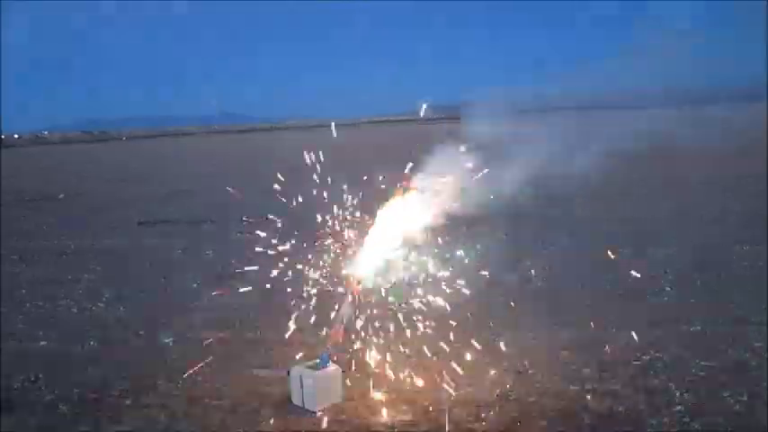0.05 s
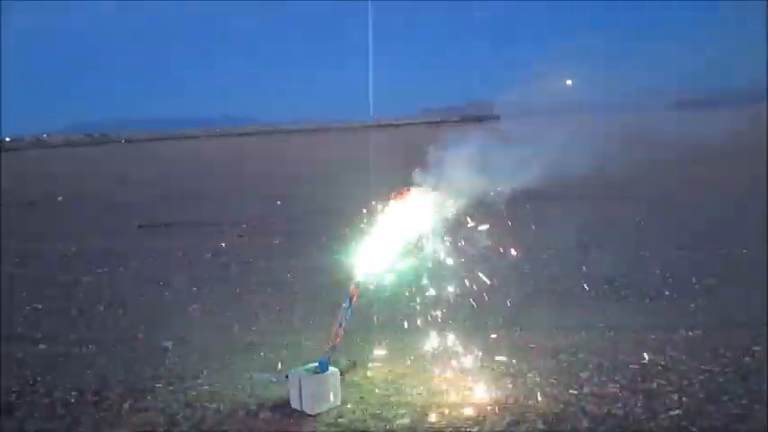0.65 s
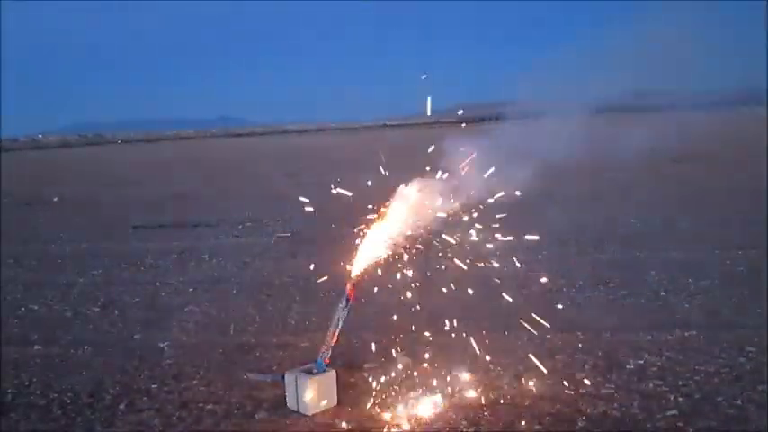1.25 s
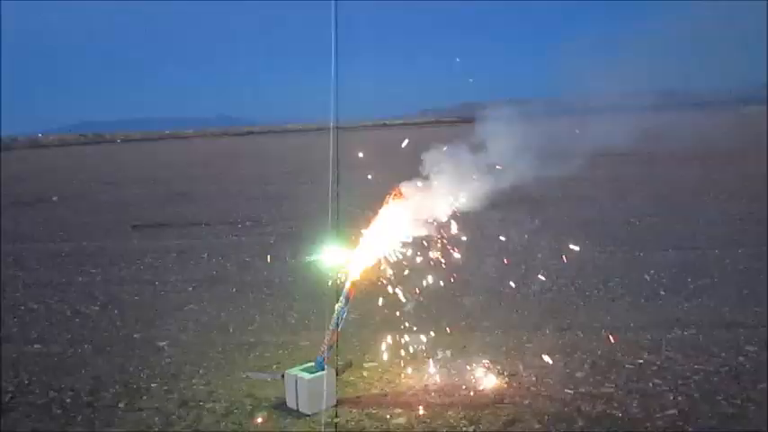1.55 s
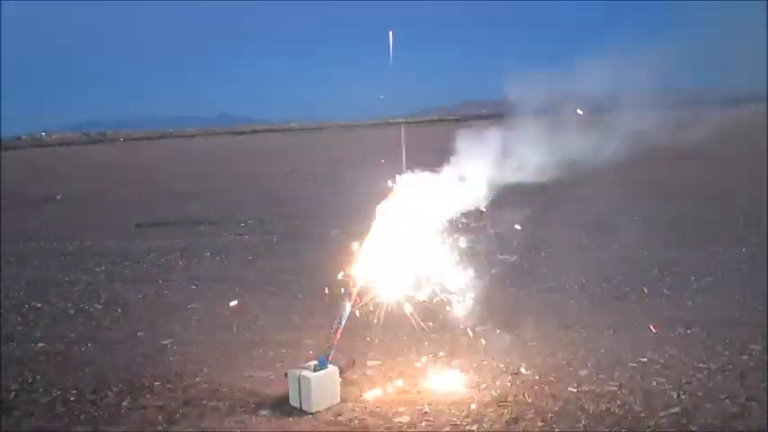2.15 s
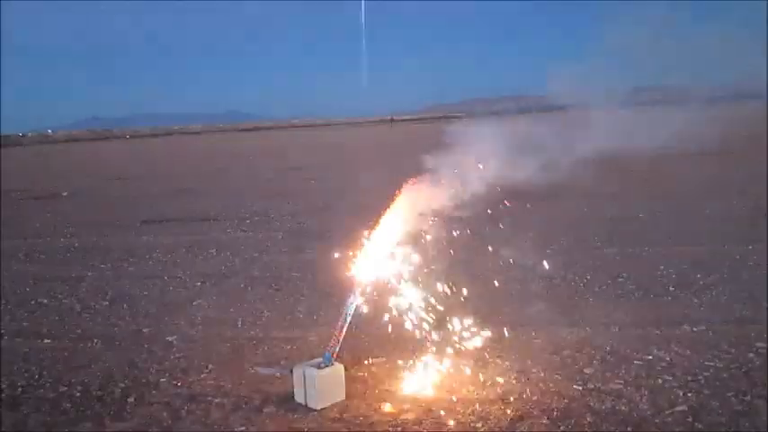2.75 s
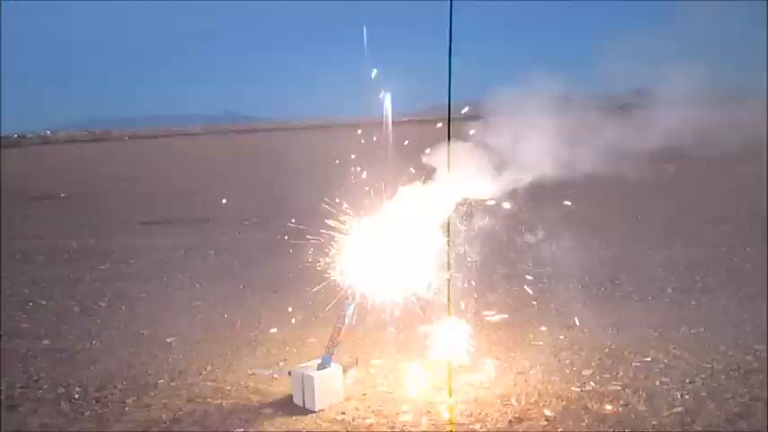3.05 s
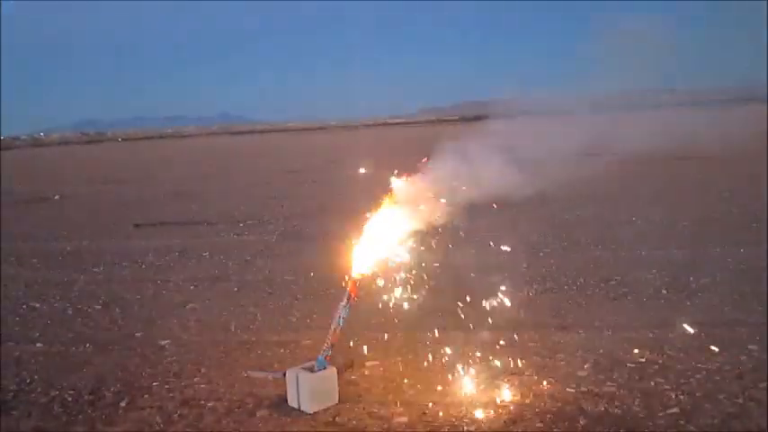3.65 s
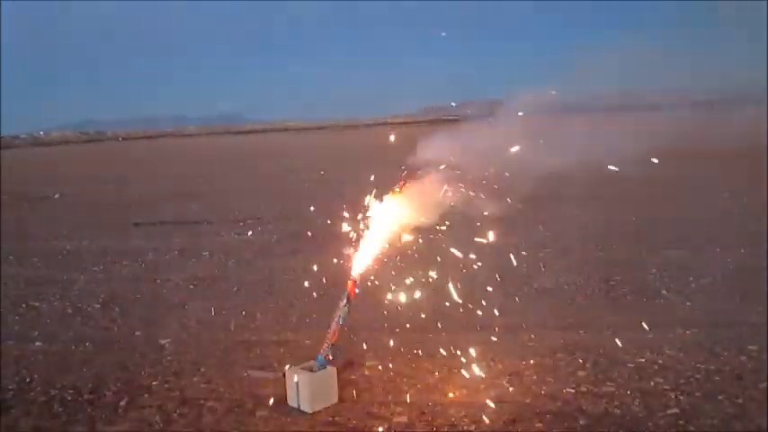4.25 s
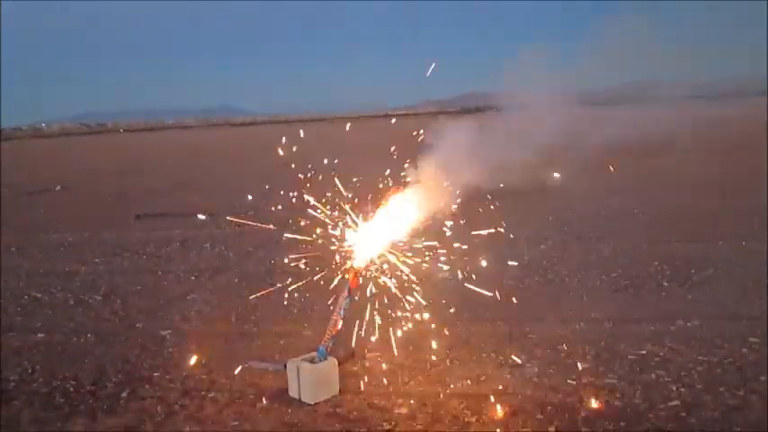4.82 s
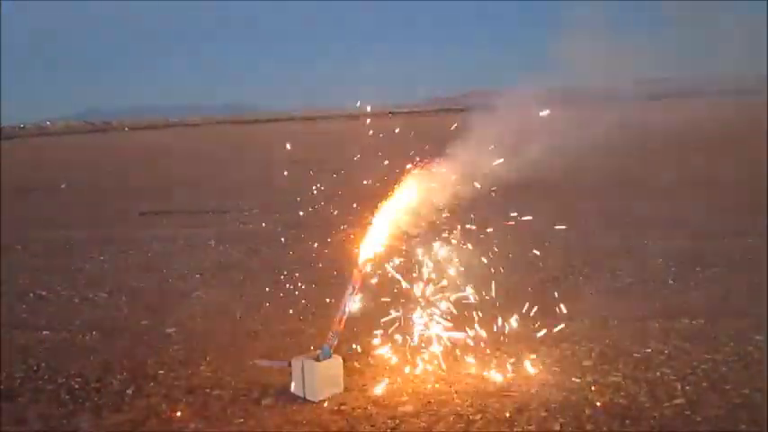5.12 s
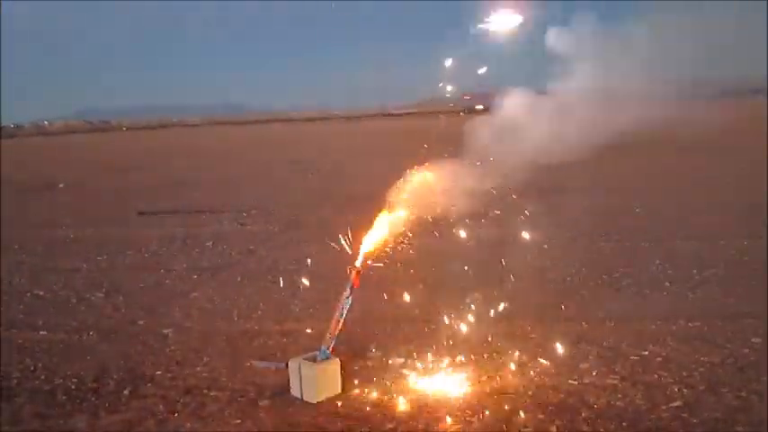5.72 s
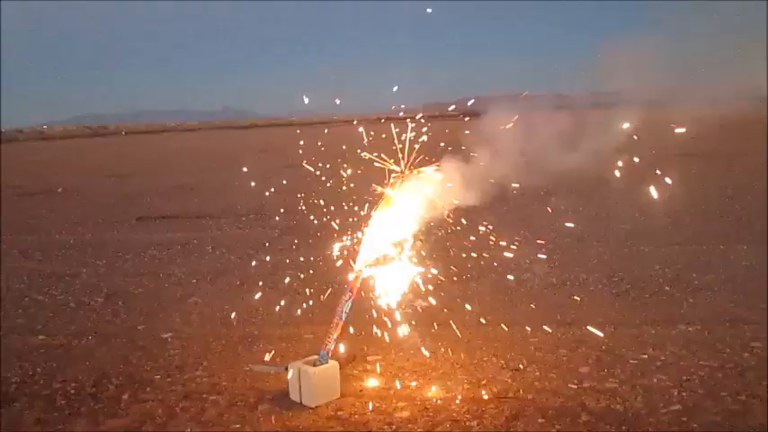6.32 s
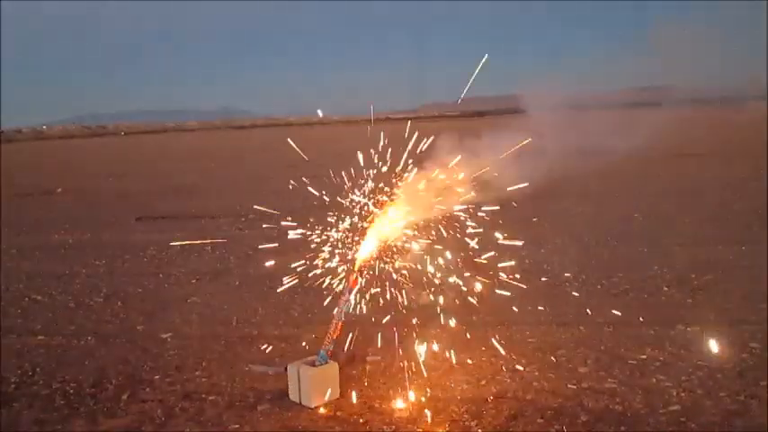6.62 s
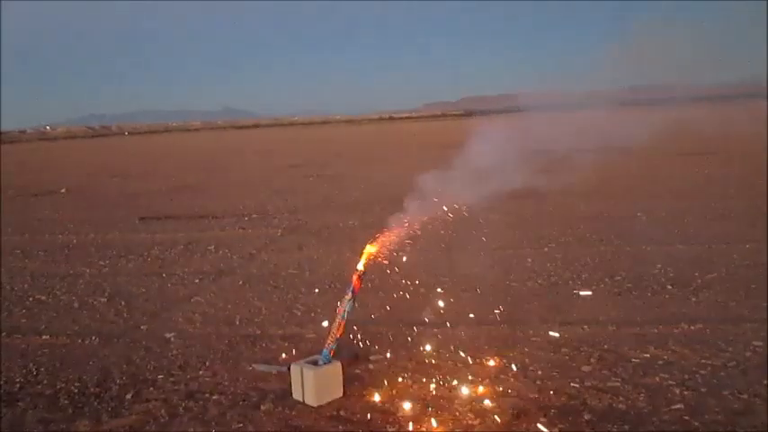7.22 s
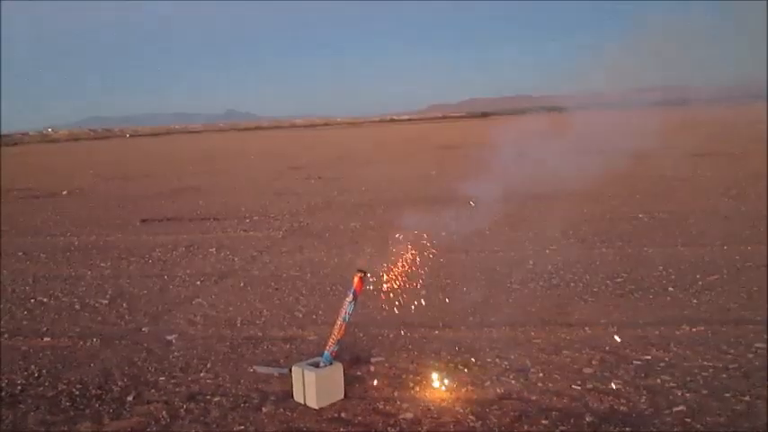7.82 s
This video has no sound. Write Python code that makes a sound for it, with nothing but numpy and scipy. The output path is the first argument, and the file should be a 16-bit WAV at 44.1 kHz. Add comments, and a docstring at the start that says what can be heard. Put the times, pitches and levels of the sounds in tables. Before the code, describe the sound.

A firework fountain burns on open gravel a few metres away. From the start there is a soft, fluttering rush of flame, a faint sizzle of tiny sparks and a low, wavering hum with rumble, like an engine idling far off. All three continue quietly throughout. Almost at once, much louder pops break in, short and sharp, in irregular clusters of several a second. Each scatters briefly off the stones; strong ones are followed by a tiny snap, and some ring hollow. Heavy pops stand out at about 1.6, 3.1 and 5.5 seconds, with a deeper one at 3.2. The popping pauses briefly around 4.5 seconds, and the sizzle swells in patches from 5 seconds. The pops are thickest between 6 and 7 seconds, peaking near 6.6. Hollow, biting bursts take over from about 7.2 seconds until the end, just before 8 seconds.

```python
"""A flame rushes, tiny sparks sizzle and a low hum drones; almost at once, loud pops break in.
A firework fountain burns on open gravel, a few metres from a hand-held camera.
Its pellets burst one by one: each pop is a short blast, mirrored by the ground and scattered by the
stones. Some pops ring hollow; strong open-air pellets shed a crumb that snaps a moment later."""
import sys
import numpy as np
from scipy import signal
from scipy.fft import rfft, irfft, next_fast_len
from scipy.io import wavfile
from scipy.ndimage import map_coordinates

SR = 44100
rng = np.random.default_rng(int(sys.argv[2]) if len(sys.argv) > 2 else 0)


def dump(signal):
    """Clip the signal to [-1, 1] and save it as 16-bit WAV at the path in sys.argv[1]."""
    limited = np.clip(np.atleast_2d(signal).T, -1, 1)
    pcm = np.round(limited * 32767).astype(np.int16)
    wavfile.write(sys.argv[1], SR, pcm)


N = 347062

# gas jet envelope: (time [s], relative level [dB])
FLAME_LEVEL = [(0, -57.5), (1.2, -57.5), (1.51, -55.5), (1.78, -57), (3.0, -58), (3.44, -64), (4.3, -59),
               (5.2, -56.5), (7.87, -60.5)]
# gas jet spectrum: (frequency [Hz], gain [dB])
FLAME_SPECTRUM = [(100, -20.5), (350, -2.5), (750, 2), (1200, -6), (1700, -9.5), (2500, -24), (5000, -28),
                  (9000, -37), (16000, -51)]
# fine spark envelope: (time [s], relative level [dB])
SIZZLE_LEVEL = [(0, -62), (0.3, -76.5), (0.7, -71), (1.3, -81), (1.42, -65), (2.05, -68.5), (2.3, -77),
                (2.9, -64), (3.5, -72), (3.75, -69), (4.4, -68), (4.64, -87), (4.97, -57), (5.4, -81.5),
                (5.6, -59.5), (6.05, -64), (6.6, -56.5), (7.25, -79)]
# fine spark spectrum: (frequency [Hz], gain [dB])
SIZZLE_SPECTRUM = [(800, -17), (2500, 3), (4500, 2.5), (7000, -6.5), (10000, -7.5), (13000, -16.5),
                   (15000, -30), (17000, -34.5)]
# lines of the hum: (frequency [Hz], level [dB])
HUM_LINES = [(74.3, -60), (148.6, -62), (198.5, -65.5), (209, -70.5), (219.5, -66), (222.8, -56.5)]
# rumble spectrum: (frequency [Hz], gain [dB])
RUMBLE_SPECTRUM = [(20, -9), (45, -0.5), (80, 4.5), (110, 0), (170, 0.5), (250, 0.5), (340, -2.5),
                   (700, -32.5), (3000, -73.5)]
# pellets bursting in open air: (time [s], energy [dB], centre [Hz], crack [dB])
OPEN_POPS = [(0.038, 3.5, 1110, 6), (0.0436, 11, 600, 3), (0.1813, -18.5, 700, 8), (0.206, -2.5, 980, -4),
             (0.2256, 3.5, 1060, -13), (0.3163, 5.5, 760, -0.5), (0.3479, -19, 1150, 4),
              (0.3865, -12.5, 740, -0.5), (0.493, 9.5, 735, 3), (0.5149, 10, 835, -1),
             (0.6153, -17.5, 800, 13), (0.6351, -17, 860, -2), (0.706, -16, 720, 10),
             (0.7125, -15.5, 1150, -4), (0.774, -28.5, 1000, -12), (0.8444, -14, 2050, -10.5),
             (0.9054, -33, 1100, 4), (0.9178, -20.5, 600, -3), (0.9765, 6, 910, -4.5), (0.995, 9, 717, 3.5),
             (1.0485, -14, 820, 6), (1.1468, -14, 1355, 1), (1.1806, -20, 2010, -16), (1.195, 2, 1000, -7),
             (1.234, -3, 850, 5), (1.2473, -18.5, 1500, -2), (1.3832, -20, 1340, -5), (1.6072, 14, 560, 9),
             (1.6455, 5, 810, -6), (1.9589, -18, 1100, 8), (1.9776, 6.5, 730, -0.5), (2.1608, 1, 740, 8),
             (2.2022, -14, 1980, -17), (2.2364, 9.5, 624, 4.5), (2.366, 8, 870, -26),
             (2.3942, 8.5, 580, 5.5), (2.5671, -20.5, 1050, 6), (2.695, -26, 507, 2),
             (2.8008, 5.5, 1150, -10), (2.834, -3.5, 900, 5), (2.8386, -4.5, 880, -10),
             (2.8904, -16, 900, 3), (2.902, -18, 1500, -3), (2.9944, -13.5, 1980, -13.5),
             (2.9993, 2.5, 626, 5.5), (3.081, -2, 695, 7), (3.0862, 15.5, 802, 0), (3.2302, 14.5, 265, 2),
             (3.3885, 5, 773, -9.5), (3.4083, -1.5, 670, 3), (3.4191, -20, 1380, 1),
             (3.4485, -21.5, 2600, -20), (3.524, -25, 1790, -18), (3.5507, -16, 920, 2),
             (3.5549, -15.5, 1220, -3.5), (3.8658, -1, 550, 2), (3.9197, 0, 700, 1),
             (4.0306, -20, 1600, -2), (4.0527, 9.5, 836, -6), (4.146, -12, 600, 14), (4.1654, 5.5, 730, 3),
             (4.2433, -19, 700, 10.5), (4.297, -2.5, 590, 8), (4.3162, -13, 1000, -14),
             (4.3307, 0.5, 910, -13), (4.3685, -1, 690, 5), (4.738, -25.5, 1900, -17), (4.7969, 7, 870, -8),
             (4.825, 4.5, 1180, -12), (4.838, -8.5, 910, -6), (4.8934, -25, 1300, 2),
             (4.9168, -2.5, 690, 0.5), (4.9427, -22, 730, 7), (5.0905, 6, 743, 2.5),
             (5.1229, -13.5, 900, -3), (5.145, -16, 1100, -1), (5.1493, -13.5, 800, 7.5),
             (5.2128, -11, 1400, -5), (5.216, 5.5, 694, 5), (5.2534, -12, 1400, 1), (5.308, -15, 900, 5),
             (5.3165, -16.5, 1120, -3), (5.3433, -16.5, 750, -9.5), (5.4477, -11, 1020, -3.5),
             (5.471, 12.5, 660, 5.5), (5.6294, -1.5, 770, 10.5), (5.6334, -11.5, 900, -17),
             (5.6532, -18.5, 756, 7), (5.7548, -20.5, 690, 3), (6.038, -13, 1240, -12.5),
             (6.1096, -21, 800, 6.5), (6.1397, -1.5, 1050, -12.5), (6.1583, 6.5, 990, 2.5),
             (6.182, 0, 1310, -2.5), (6.203, 3.5, 800, 4), (6.2343, 9, 708, 3), (6.2885, -4, 1250, -12),
             (6.313, 9, 864, -29), (6.3301, -4, 1900, -16), (6.3462, -15, 2280, -7.5),
             (6.3576, -10, 1420, -2), (6.37, -22, 900, 12), (6.3797, -18.5, 2600, -6),
             (6.4116, 5.5, 1042, -3), (6.423, -12, 1340, -6), (6.432, -6.5, 910, 4),
             (6.4824, -13.5, 700, 7), (6.512, -2, 756, 2), (6.5617, -7, 2690, -4.5),
             (6.5855, 16.5, 386, 6.5), (6.621, 9.5, 960, -3.5), (6.6741, 11.5, 780, -1),
             (6.7212, 6.5, 960, -19), (6.7275, -2.5, 1150, -12), (6.7602, -17.5, 1390, 10),
             (6.8367, -7.5, 1580, -11), (6.8861, -13.5, 1330, 3), (6.9174, -6, 1420, -2.5),
             (6.9677, -18, 770, 8), (6.9882, -0.5, 730, 6), (7.0167, -10.5, 1000, -3),
             (7.0263, -1.5, 1850, -3), (7.0434, -9, 670, 1), (7.061, -19, 960, 11), (7.082, -5.5, 2450, -8),
             (7.0983, -6.5, 720, 10), (7.1176, -13, 1220, 5), (7.367, -4.5, 1880, -7),
             (7.5513, -15, 1350, -1), (7.5618, -7, 710, 10.5)]
# ringing pops, as of pellets bursting in the tube mouth:
# (time [s], energy [dB], ring [Hz], damping [width/centre], bite [dB])
TUBE_POPS = [(0.3578, -9, 1350, 0.94, 0), (1.093, -9.5, 1720, 0.38, -12), (1.5153, -2, 1630, 0.34, -8),
             (1.6932, -9.5, 1480, 0.85, 5), (2.09, -16, 1730, 0.12, -9), (3.366, -19, 1610, 0.25, 3),
             (3.6413, -1.5, 1670, 0.5, 2), (4.2837, -7, 1110, 0.98, 9), (4.9866, -3, 1480, 0.41, -5),
             (5.8623, 4, 660, 0.35, 13), (6.13, -7, 1390, 0.35, 5), (7.1668, -19, 907, 0.41, 19),
             (7.2868, 7, 1036, 0.53, 10), (7.3461, -19.5, 1200, 0.58, 10.5), (7.4526, -8, 757, 0.89, 7.5),
             (7.4697, 11, 1070, 0.86, 8.5), (7.5146, -5, 1264, 0.49, 5), (7.527, -8.5, 1210, 0.6, 4),
             (7.7375, -16.5, 1170, 0.53, 10), (7.7414, 5, 1050, 0.51, 9.5), (7.8473, -25.5, 990, 0.33, 0)]
# small, high blasts swing least: (centre [Hz], damping [width/centre])
BLAST_DAMPING = [(250, 1.54), (600, 1.33), (750, 1.5), (1100, 2.23), (2500, 4.8)]
# small pellets burst higher up: (centre [Hz], ground echo delay [ms])
GROUND_ECHO = [(300, 1.8), (700, 1.787), (900, 1.95), (1200, 1.997), (2000, 3.2)]
# only the heaviest open-air bursts bite hard: (energy [dB], bite [dB])
BLAST_BITE = [(-20, 1.5), (9, 1.5), (10.5, 6.5)]
# scatter off near stones: (frequency [Hz], gain [dB])
NEAR_SPECTRUM = [(100, -5.5), (400, 2), (1300, -1.5), (2500, 1.5), (6000, -3), (15000, -2.5)]
# scatter off far stones: (frequency [Hz], gain [dB])
FAR_SPECTRUM = [(100, -21), (600, -17.5), (1500, -3), (3500, -1.5), (7000, -0.5), (15000, -5)]
# blast colour at the microphone: (frequency [Hz], gain [dB])
MIC_SPECTRUM = [(100, 3.5), (250, 1.5), (400, -3.5), (700, 1.5), (1200, -1.5), (1650, 0), (2300, -6),
                (3200, -1.5), (4200, 0.5), (6000, 1), (9000, 1.5), (12000, -2.5), (15500, -8),
                (17000, -33.5)]
# narrow dips of the camera: (centre [Hz], width [Hz])
CAMERA_NOTCHES = [(3950, 190), (7900, 170)]


def amp(db):
    return 10 ** (np.asarray(db) / 20)


def unit_rms(x):
    return x / np.sqrt(np.mean(np.abs(x) ** 2) + 1e-20)


def lookup(rows, x):
    return np.interp(x, *np.transpose(rows))


def gain(points, hz):
    """Linear gain from (frequency [Hz], gain [dB]) points, log frequency axis."""
    points_hz, db = np.transpose(points)
    return amp(np.interp(np.log(hz + 1), np.log(points_hz + 1), db))


def wobble(rate_hz):
    """Smooth random curve through rate_hz knots a second."""
    knots = rng.standard_normal(int(N * rate_hz / SR) + 4)
    return map_coordinates(knots, [np.arange(N) * rate_hz / SR])


def filtered(x, response):
    """x through a complex response(hz)."""
    size = 2 * next_fast_len(N // 2 + SR // 4)
    return irfft(rfft(x, size) * response(np.fft.rfftfreq(size, 1 / SR)), size)[:N]


def coloured(x, spectrum):
    """x shaped by a spectrum table, rms 1."""
    return unit_rms(filtered(x, lambda hz: gain(spectrum, hz)))


def flame(gain_db=1, flutter_db=1.9):
    """The jet of burning gas rushes and flutters."""
    level_db = lookup(FLAME_LEVEL, np.arange(N) / SR) + flutter_db * wobble(rate_hz=9.1)
    return amp(level_db + gain_db) * coloured(rng.standard_normal(N), FLAME_SPECTRUM)


def grit(size, spread_db=4):
    """Noise with an uneven level from sample to sample."""
    return rng.standard_normal(size) * amp(spread_db * rng.standard_normal(size))


def sizzle(gain_db=2, rate_hz=34, spread_db=4, spurt_s=0.006, wash_s=0.019, rise_s=0.0007):
    """Tiny sparks flare at random: each a short gritty spurt and its wash over the gravel."""
    starts = rng.random(N) < rate_hz / SR
    strengths = amp(spread_db * np.clip(rng.standard_normal(N), -2, 2))
    t = np.arange(SR // 10) / SR
    flare = (np.exp(-t / spurt_s) + 0.15 * np.exp(-t / wash_s)) * (1 - np.exp(-t / rise_s))
    flares = unit_rms(signal.fftconvolve(starts * strengths, flare)[:N])
    level_db = lookup(SIZZLE_LEVEL, np.arange(N) / SR)
    return amp(level_db + gain_db) * coloured(flares * grit(N), SIZZLE_SPECTRUM)


def drone(rumble_db=-53, drift=0.0036, waver_db=2):
    """Unsteady hum over a low rumble, as of an engine idling some way off."""
    clock_s = np.cumsum(1 + drift * wobble(rate_hz=5.5)) / SR
    hum = sum(amp(db + waver_db * wobble(rate_hz=3.1)) * np.sin(2 * np.pi * (hz * clock_s + rng.random()))
              for hz, db in HUM_LINES)
    rumble = amp(rumble_db) * coloured(rng.standard_normal(N), RUMBLE_SPECTRUM)
    return np.sqrt(2) * hum + rumble


def open_burst(time_s, db, centre_hz, crack_db):
    """Pellet size sets damping and ground echo; energy sets bite."""
    damping, echo_ms = lookup(BLAST_DAMPING, centre_hz), lookup(GROUND_ECHO, centre_hz)
    return time_s, db, centre_hz, damping, crack_db, lookup(BLAST_BITE, db), echo_ms


def crumbs(shed_above_db=-1, lag_s=0.029, energy_db=-23.5, spread_db=2, centre_hz=1410, spread_oct=0.5):
    """Each strong open-air pellet sheds a crumb, which snaps a moment later."""
    draws = rng.standard_normal((len(OPEN_POPS), 3))
    return [open_burst(time_s + lag_s * 2 ** (lag / 2), energy_db + spread_db * strength,
                       centre_hz * 2 ** (spread_oct * pitch), crack_db=5)
            for (time_s, db, *_), (lag, strength, pitch) in zip(OPEN_POPS, draws) if db > shed_above_db]


def tube_bursts(crack_db=-4.5, echo_ms=1.737):
    """Hollow bursts in the tube share one crack and one ground echo delay."""
    return [(time_s, db, ring_hz, damping, crack_db, bite_db, echo_ms)
            for time_s, db, ring_hz, damping, bite_db in TUBE_POPS]


def resonance(hz, centre_hz, width_hz):
    """Causal band-pass, gain 1 at centre."""
    return 1j * hz * width_hz / (centre_hz ** 2 - hz ** 2 + 1j * hz * width_hz)


def blast(hz, centre_hz, damping, crack_db, bite_db, knee_hz=3000):
    """Spectrum of a pressure spike and its suction, energy 1. Crack: steep front. Bite: short ring."""
    swing = resonance(hz, centre_hz, centre_hz * damping)
    front = (1 + amp(crack_db) * 1j * hz / knee_hz) / (1 + 1j * hz / knee_hz)
    bite = 1 + (amp(bite_db) - 1) * resonance(hz, centre_hz=3530, width_hz=1900)
    return unit_rms(swing * front * bite)


def minimum_phase(magnitude):
    cepstrum = irfft(np.log(magnitude))
    half = len(cepstrum) // 2
    cepstrum[1:half] *= 2
    cepstrum[half + 1:] = 0
    return np.exp(rfft(cepstrum))


def delay(hz, ms):
    return np.exp(-2j * np.pi * hz * ms / 1000)


def scatter(t, t60_s, rise_s):
    """Response of countless uneven stones: echoes swell and die away, energy 1."""
    tail = grit(len(t)) * amp(-60 * t / t60_s) * (1 - np.exp(-(t / rise_s) ** 2))
    return rfft(tail / np.linalg.norm(tail))


def pops(size=8192):
    """Each blast arrives directly, off the ground, off a surface by the camera and off the gravel."""
    t, hz = np.arange(size) / SR, np.fft.rfftfreq(size, 1 / SR)
    near, far = amp(-6.5) * gain(NEAR_SPECTRUM, hz), amp(-17.5) * gain(FAR_SPECTRUM, hz)
    farthest = amp(-10.5) * far / (1 + (hz / 7000) ** 2)  # air dulls the longest paths
    ground = 0.62 / (1 + 1j * hz / 7000)  # gravel mirrors treble poorly
    close_surface = 1 + 0.12 * delay(hz, ms=1.562)
    mic = minimum_phase(gain(MIC_SPECTRUM, hz))
    fade = np.clip(10 * (1 - t / t[-1]), 0, 1) ** 2
    bursts = tube_bursts() + [open_burst(*row) for row in OPEN_POPS] + crumbs()
    out = np.zeros(N + size)
    for time_s, db, centre_hz, damping, crack_db, bite_db, echo_ms in bursts:
        paths = (1 + ground * delay(hz, echo_ms)) * close_surface
        paths += near * scatter(t, t60_s=0.016, rise_s=0.0016)
        paths += far * scatter(t, t60_s=0.087, rise_s=0.0062)
        paths += farthest * scatter(t, t60_s=0.32, rise_s=0.025)
        pop = irfft(blast(hz, centre_hz, damping, crack_db, bite_db) * paths * mic)
        out[round(time_s * SR):][:size] += amp(db) * fade * pop
    return out[:N]


def scene():
    return (sizzle() + flame() + drone() + pops())[None]


def record(dry, ceiling=0.99, cutoff_hz=16800):
    """The camera rounds off peaks; it has two narrow dips, a soft top octave and a band limit."""
    def response(hz):
        dips = np.prod([1 - resonance(hz, *notch) for notch in CAMERA_NOTCHES], axis=0)
        soft_top = gain([(10000, -0.5), (13000, -5.5), (16500, -9.5)], hz)
        return dips * soft_top / (1 + (hz / cutoff_hz) ** 200)

    rounded = dry[0] / (1 + (dry[0] / ceiling) ** 4) ** (1 / 4)
    return filtered(rounded, response)[None]


dry = scene()
out = record(dry)
dump(out)
```